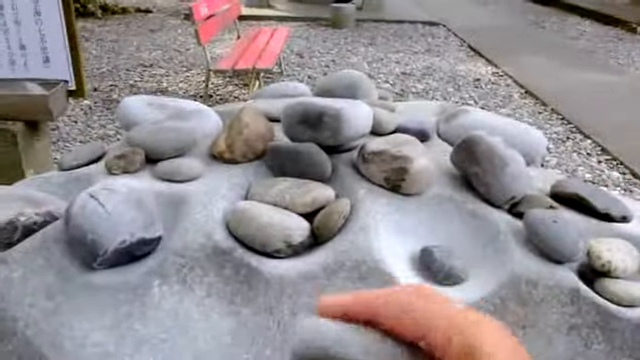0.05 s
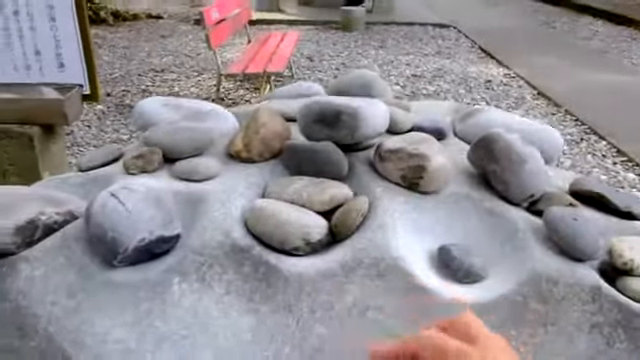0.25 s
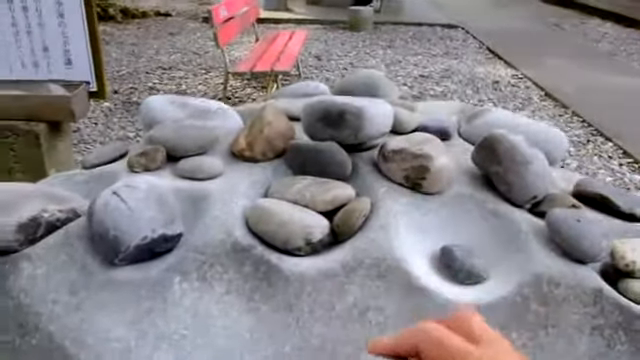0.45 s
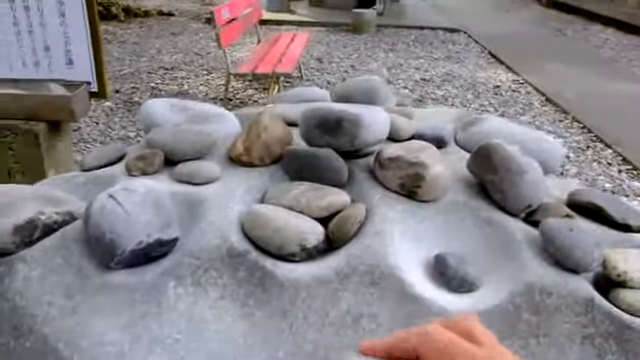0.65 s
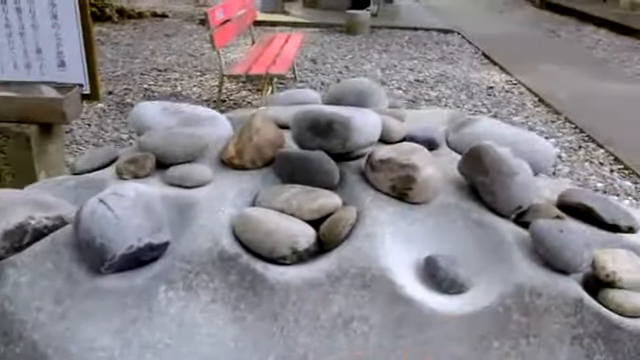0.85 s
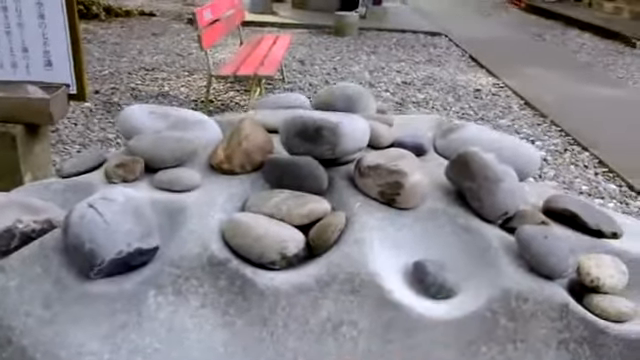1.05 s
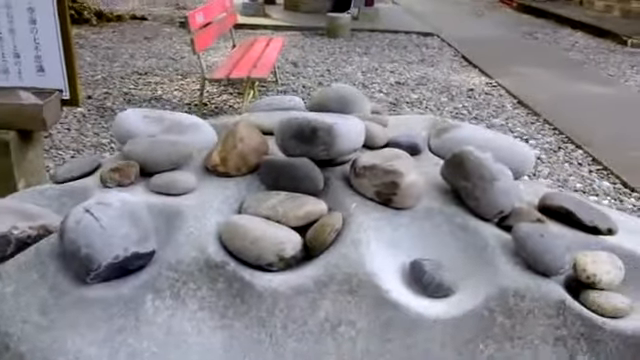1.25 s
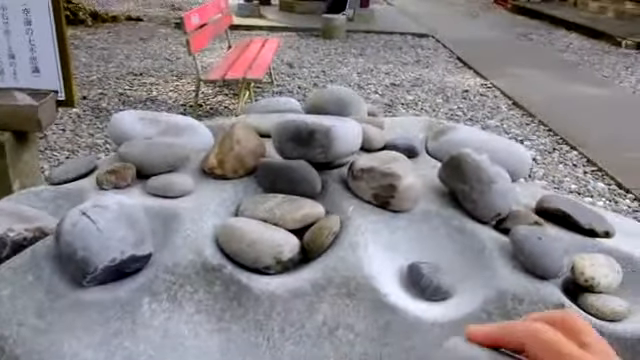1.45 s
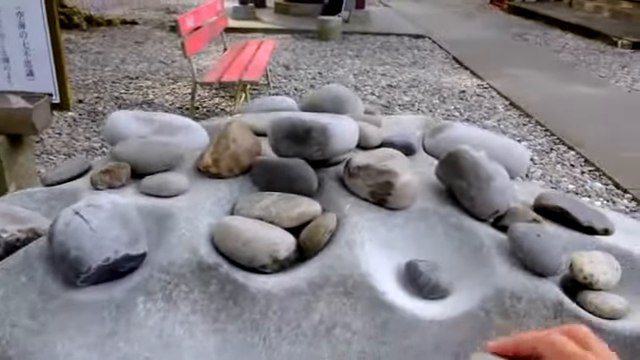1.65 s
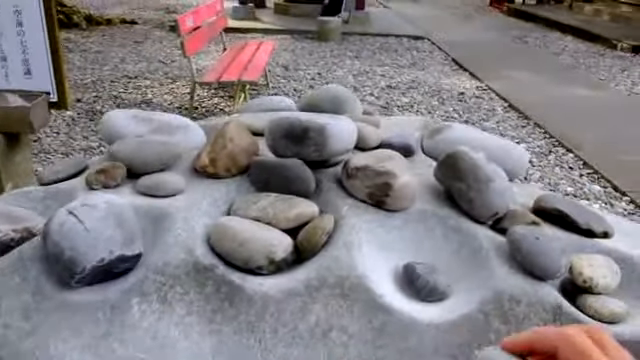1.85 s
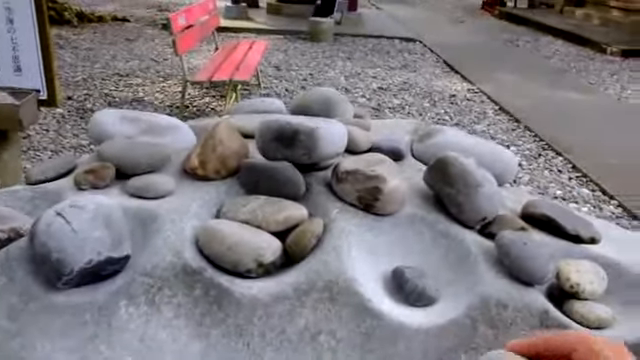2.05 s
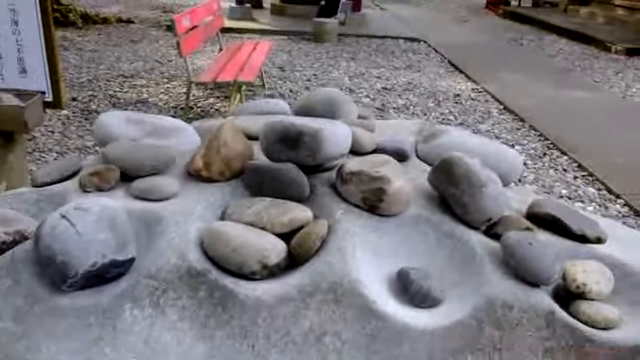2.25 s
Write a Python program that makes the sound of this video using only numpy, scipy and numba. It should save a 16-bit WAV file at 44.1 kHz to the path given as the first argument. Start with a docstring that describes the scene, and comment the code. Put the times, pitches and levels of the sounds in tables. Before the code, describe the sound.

A stone knocks four times on a boulder that rings like metal, outdoors.

```python
"""Outdoors in a yard, a hand-held stone knocks four times on a ringing boulder, twice on each of two spots.
Two blows bounce, and midway the stone brushes the rock. Each knock gives a short clack and sets the
boulder's modes ringing; gravel and walls scatter the clack back. A fast limiter ducks at each knock,
so the ring seems to swell in just after it. Behind it all are a faint bird and a distant rumble."""
import sys
import numpy as np
from scipy import signal
from scipy.fft import rfft, irfft
from scipy.io import wavfile
from scipy.ndimage import uniform_filter1d, minimum_filter1d
from numba import njit

SR = 44100
rng = np.random.default_rng(int(sys.argv[2]) if len(sys.argv) > 2 else 0)


def generate_wav(sig):
    """Save sig (samples, or channels by samples) to the path in sys.argv[1] as 16-bit PCM at SR."""
    pcm = np.round(np.clip(np.atleast_2d(sig).T, -1, 1) * 32767).astype(np.int16)
    wavfile.write(sys.argv[1], SR, pcm)


N = 101429

# Knocks and bounces. Each row: start in seconds, strength in dB, contact time in ms, spot (0 or 1).
BLOWS = [(.2121, 1.5, 0.065, 0), (0.2461, -18, .17, 0), (0.5025, 2, 0.076, 0), (1.571, -1, 0.11, 1),
         (1.6067, -21, 0.17, 1), (1.8952, 1.5, .09, 1)]


def undb(db):
    """Decibels to gain."""
    return 10 ** (np.asarray(db) / 20)


def unit_rms(x):
    """Scale to rms 1."""
    return x / np.sqrt(np.mean(x ** 2))


def eq_curve(points):
    """Gain at every frequency from (Hz, dB) points."""
    hz, db = np.array(points).T
    return undb(np.interp(np.log(np.fft.rfftfreq(N, 1 / SR) + 1), np.log(hz), db))


def noise(colour):
    """Noise at rms 1, coloured by (Hz, dB) points."""
    return unit_rms(irfft(rfft(rng.standard_normal(N)) * eq_curve(colour), N))


def diffuse_noise(colour, width):
    """Stereo noise from mid and side; the width curve sets the side level at each frequency."""
    side = irfft(rfft(noise(colour)) * eq_curve(width), N)
    return noise(colour) + np.array([[1], [-1]]) * side


def since(start):
    """Seconds since a moment, zero before it."""
    return np.maximum(np.arange(N) / SR - start, 0)


def fade(age, t60):
    """Sudden onset, then a decay of 60 dB every t60 seconds."""
    return (age > 0) * np.exp(-np.log(1000) * age / t60)


def wavering_tone(phase, width_hz):
    """A tone blurred into a narrow band by random drift in level and phase."""
    white = rng.standard_normal(N) + 1j * rng.standard_normal(N)
    lowpass = np.exp(-(np.fft.fftfreq(N, 1 / SR) / width_hz) ** 2)
    drift = np.fft.ifft(np.fft.fft(white) * lowpass)
    drift /= np.sqrt(np.mean(abs(drift) ** 2))
    return (drift * np.exp(1j * phase)).real


def ringing_mode(hz, t60, spot_db, pan_db):
    """One damped resonance, struck by every blow; it reaches left and right a little out of step."""
    strikes = np.zeros(N, complex)
    for start, db, _, spot in BLOWS:
        strikes[int(start * SR)] = undb(db + spot_db[spot])
    pole = np.exp((2j * np.pi * hz - np.log(1000) / t60) / SR)
    ring = signal.lfilter([1], [1, -pole], strikes)
    sides = np.array([[1], [-1]])
    pan = unit_rms(undb(sides * pan_db / 2))
    spread_rad = 0.44 * rng.choice([-1, 1])
    return (pan * np.exp(.5j * sides * spread_rad) * ring).imag


def boulder(level_db=-1.5, crowd_size=40):
    """The rock rings in strong modes and a crowd of weak high ones; the spot struck sets their balance."""
    # The strong modes. Each row: pitch in Hz, decay (t60) in seconds, relative level in dB when
    # struck at spot 0, the same at spot 1, left minus right in dB.
    modes = [ (1458.3, .8, -26, -28, -3), (1761, 1.0, -40, -40, 6), (2309, 1.5, -54, -48, -12),
             (2476, .9, -31, -53, -4), (2988, .9, -49, -54, 0), (3148, .6, -34, -37, 5),
             (3262.9, .9, -21, -20.5, -6), (3423.5, 1.0, -34, -34, 7), (3477.7, .83, -25.5, -29.5, -6),
             (3564, 1.0, -50, -46, 0), (3993.8, .7, -30, -36, -10), (4214, .45, -25, -34, -2),
             (4355.3, .6, -28.5, -47, 4), (4398.5, .7, -38, -50, 0), (4478.5, .6, -39, -40, 0),
             (4612.7, .47, -28, -33, 7), (4801, .65, -43, -50, 0), (4873, .69, -38, -43, 9),
             (5055, .5, -38, -47, 1), (5211, .6, -45, -51, 0), (5324, .55, -50, -44, 0),
             (5410, .4, -40, -50, 0), (5716, .5, -35, -39, -5), (5954, .5, -39, -41, -9),
             (6245, .48, -44, -52, 0)]
    # How strongly the crowd answers: trim in dB at spot 0, then at spot 1.
    crowd_spot_db = [-12, -11.5]
    low_hz, high_hz = 4400, 9700
    crowd_db, db_per_octave = -41.5, -5.5
    out = sum(ringing_mode(hz, t60, (db0, db1), pan) for hz, t60, db0, db1, pan in modes)
    for k, (detune, strength, side) in enumerate(rng.uniform(-1, 1, (crowd_size, 3))):
        hz = low_hz * (high_hz / low_hz) ** ((k + detune / 2) / crowd_size)
        db = crowd_db + db_per_octave * np.log2(hz / low_hz) + 4 * strength
        out += ringing_mode(hz, t60=.4, spot_db=db + np.array(crowd_spot_db), pan_db=8 * side)
    return undb(level_db) * out


def clacks(peak_db=31):
    """Stone meets rock in one short pulse; a longer contact is duller, a weaker one has less bass."""
    # The clack's tone. Each row: frequency in Hz, relative level in dB.
    colour = [(40, -31.5), (150, -12.5), (550, -3.5), (850, -4), (1300, 5), (2100, 8.5), (2800, 4),
              (3600, -19.5), (6500, -2.5), (15000, -39)]
    # The clack reaches the right side first: left delay in ms at spot 0, then at spot 1.
    left_delay_ms = [0.033, 0.07]
    hz = np.fft.rfftfreq(N, 1 / SR)
    # Minimum phase keeps the attack sharp, with no ring ahead of the hit.
    cepstrum = irfft(np.log(eq_curve(colour)), N)
    cepstrum[1:N // 2] *= 2
    cepstrum[N // 2:] = 0
    spectrum = np.exp(rfft(cepstrum))
    out = np.zeros((2, N))
    for start, db, contact_ms, spot in BLOWS:
        dulling = 1 / (1 + 1j * np.pi * hz * contact_ms / 1000) ** 2
        bass_shelf = eq_curve([(150, 0.07 * db), (760, 0)])
        arrival = start + np.array([[left_delay_ms[spot] / 1000], [0]])
        pulse = irfft(spectrum * dulling * bass_shelf * np.exp(-2j * np.pi * hz * arrival), N)
        out -= undb(peak_db + db) * pulse / abs(pulse).max()
    return out


def stone_note(start, db, hz=1906):
    """The hand-held stone's own note, damped by the fingers."""
    age = since(start)
    return undb(db) * fade(age, t60=0.023) * np.sin(2 * np.pi * hz * age)


def light_touch(start=1.178, note_db=-28, click_db=-35.5):
    """The stone brushes the rock: a tiny dull click and its own note."""
    click = noise([(200, 9), (2500, -1), (4000, -14), (11000, -22), (14000, -40)])
    return stone_note(start, note_db) + undb(click_db) * fade(since(start), t60=0.022) * click


def yard_reverb(level_db=-33):
    """Gravel and walls scatter each clack back as a fading wash."""
    # The wash's tone. Each row: frequency in Hz, relative level in dB.
    colour = [(100, -2), (500, -8.5), (1400, 2), (2400, 4), (4300, 0.5), (6000, -11.5), (9000, -26),
              (12500, -35.5), (15000, -47)]
    # Its stereo width. Each row: frequency in Hz, side minus mid in dB.
    width = [(300, -13.5), (1500, -6.5), (4500, 4.5)]
    power = sum((undb(db) * fade(since(start), t60=0.63)) ** 2 for start, db, _, _ in BLOWS)
    return undb(level_db) * np.sqrt(power) * diffuse_noise(colour, width)


def bird(echo_db=-4.5):
    """Thin, raspy calls, three nearly level and one falling, each with a short echo."""
    # The calls. Each row: start in seconds, length in seconds, first and last pitch in Hz, level in dB.
    calls = [(0.096, 0.087, 7600, 7400, -51.5), (0.18, .07, 9100, 6600, -56),
             (1.697, .08, 8100, 8200, -53.5), (0.4, .04, 6750, 6850, -72)]
    # The echo's tone. Each row: frequency in Hz, relative level in dB.
    echo_colour = [(6000, -55), (7500, -6), (8100, -11), (8700, -8.5), (10000, -62)]
    out = np.zeros(N)
    for start, length, from_hz, to_hz, db in calls:
        progress = np.minimum(since(start) / length, 1)
        phase = 2 * np.pi * np.cumsum(from_hz + (to_hz - from_hz) * progress) / SR
        call = np.sqrt(abs(np.sin(np.pi * progress))) * wavering_tone(phase, width_hz=220)
        echo = undb(echo_db) * fade(since(start + length / 2), t60=0.59) * noise(echo_colour)
        out += undb(db) * (call + echo)
    return out


def distant_rumble(air_db=-46.5, hum_db=-63.5, swell_db=-51.5):
    """A low bed of outdoor air with a wavering hum and one soft swell."""
    # The air's tone. Each row: frequency in Hz, relative level in dB.
    air_colour = [(15, -54), (25, -17.5), (75, 1), (106, -5), (167, -1.5), (196, -9.5), (383, -11),
                  (450, -12.5), (488, -14.5), (1420, -22), (3090, -27.5), (3350, -29.5), (3630, -29),
                  (12400, -44), (15000, -73)]
    # Its width, narrow in the bass. Each row: frequency in Hz, side minus mid in dB.
    air_width = [(100, -14.5), (400, -5.5), (1200, -3), (4000, -0.5)]
    # The swell's tone. Each row: frequency in Hz, relative level in dB.
    swell_colour = [(90, -28), (170, -5), (350, 5), (700, -12), (2000, -49)]
    hum_hz, swell_peak_s, swell_half_s = 168.4, 1.157, 0.11
    t = since(0)
    hum = wavering_tone(2 * np.pi * hum_hz * t, width_hz=2.7)
    swell = np.exp(-((t - swell_peak_s) / swell_half_s) ** 2) * noise(swell_colour)
    air = diffuse_noise(air_colour, air_width)
    return undb(air_db) * air + undb(hum_db) * hum + undb(swell_db) * swell


def scene():
    """The knocks, their reverb and the background, mixed in stereo."""
    stone = sum(stone_note(start, db) for start, db, _, _ in BLOWS)
    return distant_rumble() + clacks() + stone + boulder() + yard_reverb() + light_touch() + bird()


@njit
def peak_envelope(peaks, decay):
    """Jump to each peak, then let go exponentially."""
    out, held = np.empty(len(peaks)), 0.
    for i in range(len(peaks)):
        held = max(peaks[i], held * decay)
        out[i] = held
    return out


def limiter(x, threshold_db=-2, ratio=4.24, release_s=0.0088, lookahead_s=0.00033):
    """Both channels duck together at each loud clack and quickly recover."""
    window = int(lookahead_s * SR) + 1
    peaks = -minimum_filter1d(-abs(x).max(axis=0), 2 * window)
    envelope = peak_envelope(peaks, np.exp(-1 / (release_s * SR)))
    overshoot = np.maximum(envelope / undb(threshold_db), 1)
    return x * uniform_filter1d(overshoot ** (1 / ratio - 1), window)


def record(dry, knee=8, top_hz=16400):
    """Limit the clacks, soft-clip what still overshoots and cut the top end."""
    # Treble cut: the highs drop steeply above about 13.5 kHz. Each row: frequency in Hz, gain in dB.
    treble_cut = [(12000, -0.5), (13300, 0.5), (14000, -19), (16000, -15)]
    limited = limiter(dry)
    clipped = limited / (1 + abs(limited) ** knee) ** (1 / knee)
    coloured = irfft(rfft(clipped) * eq_curve(treble_cut), N)
    lowpass = signal.ellip(8, .1, 70, top_hz, fs=SR, output="sos")
    return signal.sosfilt(lowpass, coloured)


dry = scene()
out = record(dry)
generate_wav(out)
```